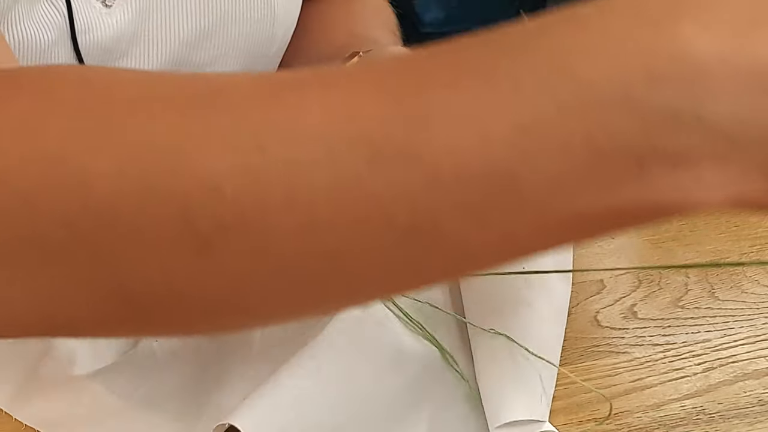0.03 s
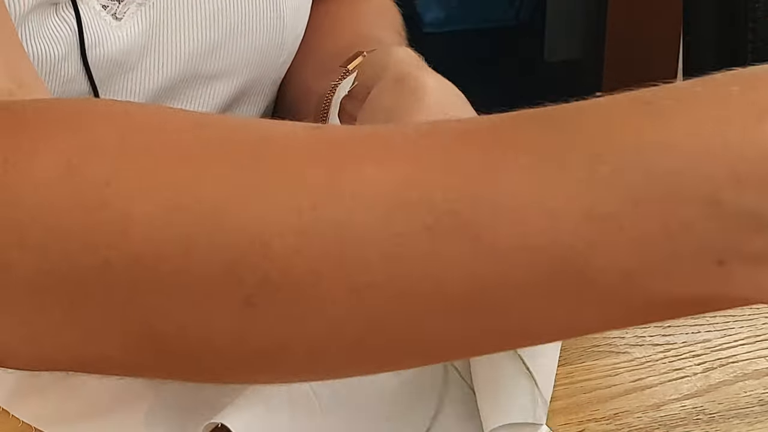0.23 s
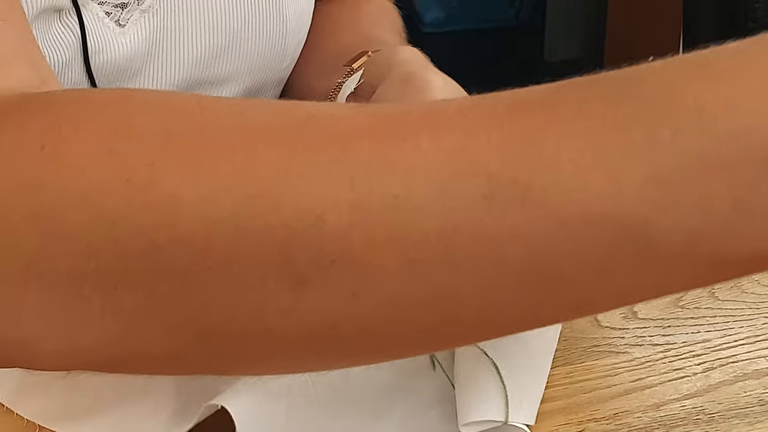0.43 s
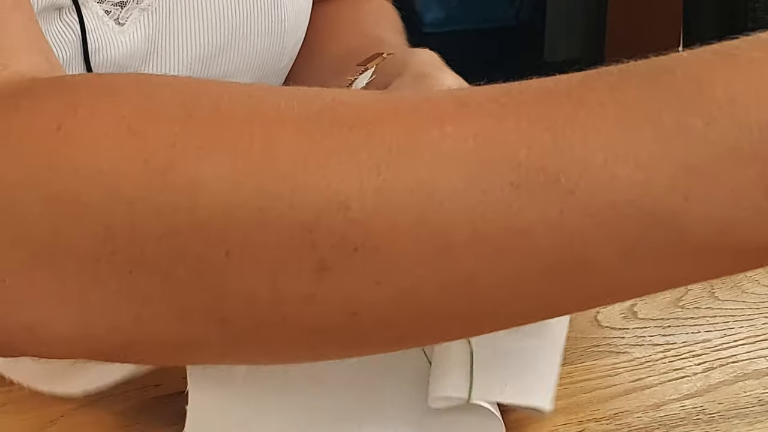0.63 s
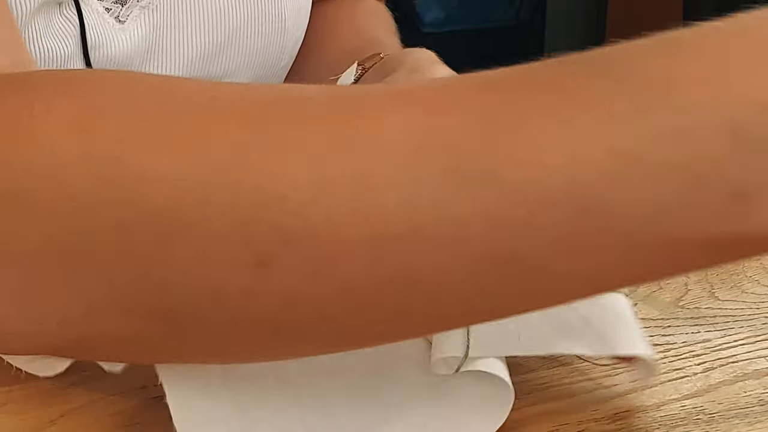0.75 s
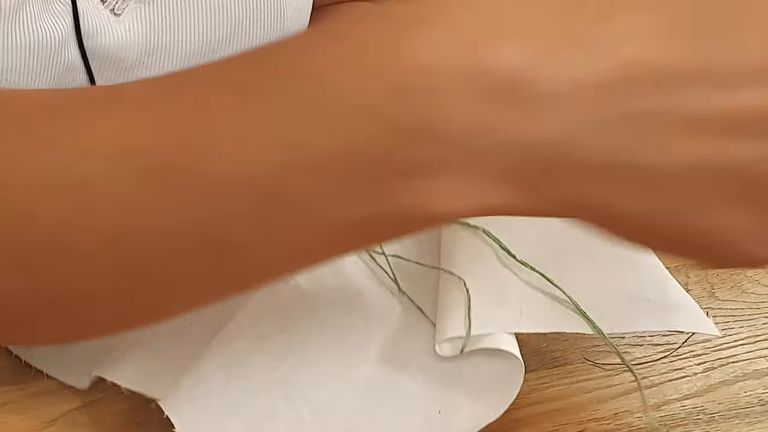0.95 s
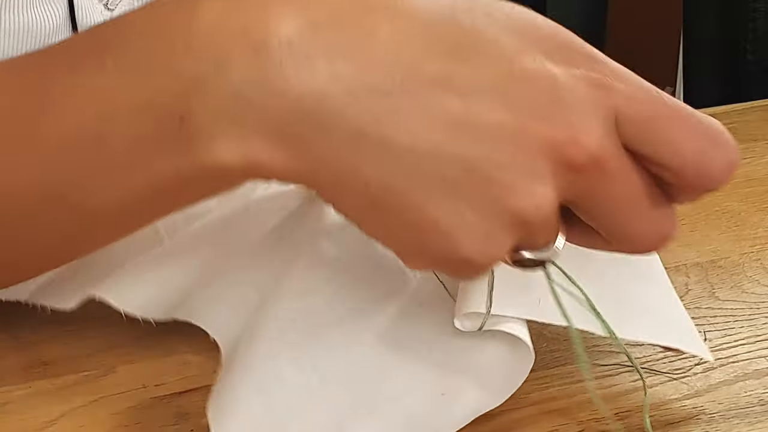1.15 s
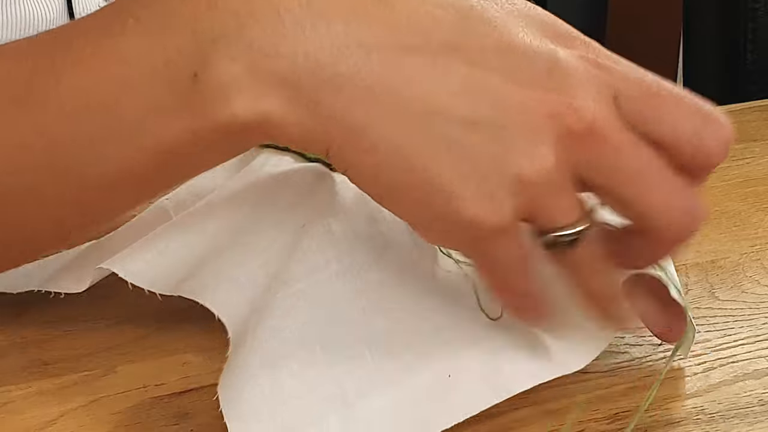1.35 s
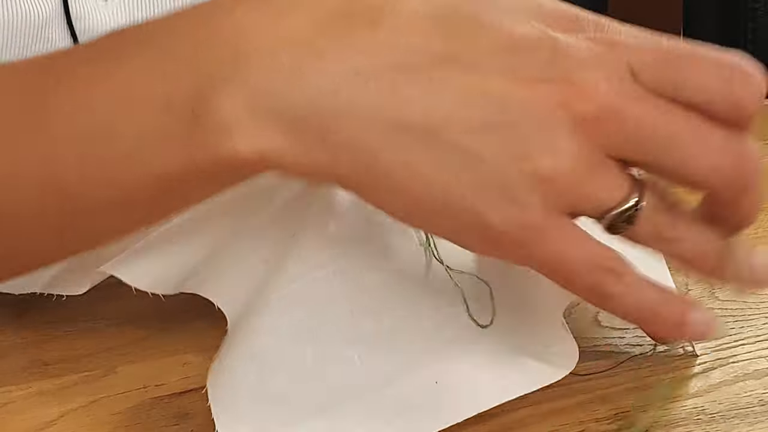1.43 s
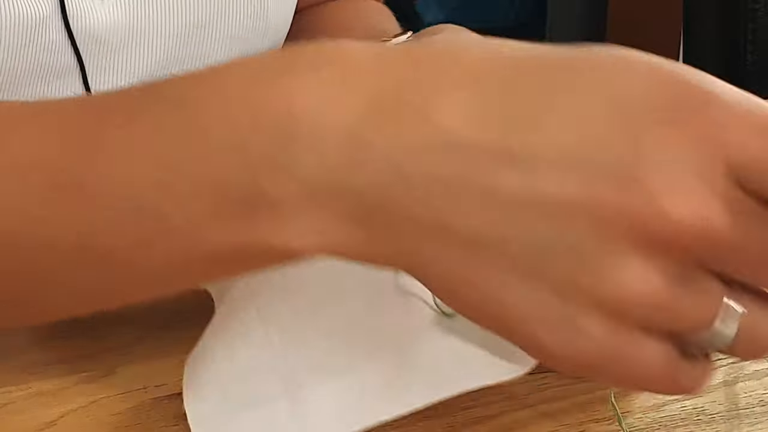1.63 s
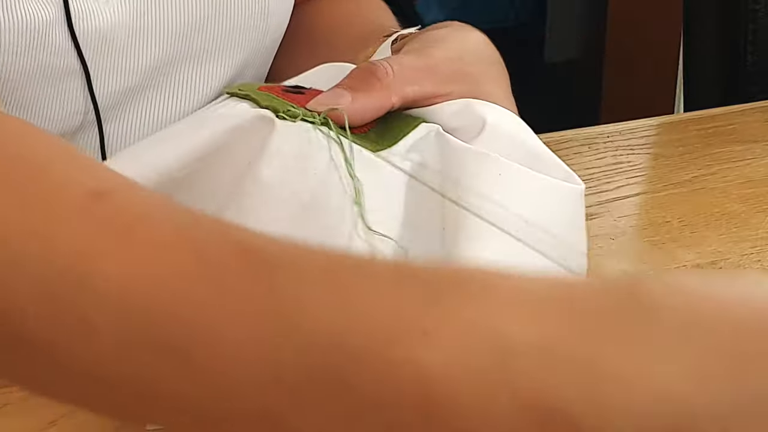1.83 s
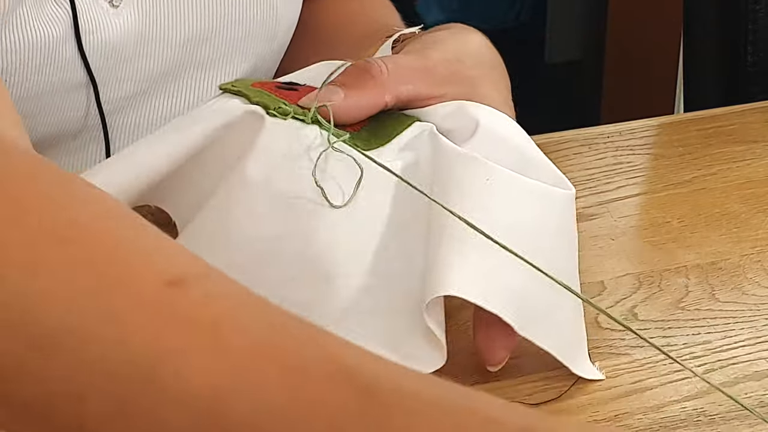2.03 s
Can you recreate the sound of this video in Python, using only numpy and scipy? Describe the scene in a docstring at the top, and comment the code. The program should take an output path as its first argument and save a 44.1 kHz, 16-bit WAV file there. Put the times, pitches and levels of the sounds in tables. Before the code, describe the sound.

Thread hisses through fabric and snaps it taut with one loud, hollow pop. The cloth then flops and slides on a wooden table, with small thread ticks and soft bumps, close to the microphone in a quiet room.

```python
"""A small, quiet room: hand sewing at a wooden table. A thread hisses through the weave, ticking
as it catches, and snaps the cloth taut with a loud, hollow pop. The cloth flops back and slides
on the table with the friction of many tiny fibres, an arm brushes past, and the thread ticks as
it is drawn again. Soft bumps and stirred air rumble at the close microphone."""
import sys
import numpy as np
from scipy import signal
from scipy.fft import rfft, irfft
from scipy.io import wavfile

SR = 44100
rng = np.random.default_rng(int(sys.argv[2]) if len(sys.argv) > 2 else 0)


def store_pcm(level_fs):
    """Save levels as 16-bit WAV."""
    pcm = np.round(np.clip(level_fs, -1, 1) * 32767).astype(np.int16)
    wavfile.write(sys.argv[1], SR, np.atleast_2d(pcm).T)


N = 92610


def undb(db):
    return 10 ** (np.asarray(db) / 20)


def unit_rms(x):
    return x / np.sqrt(np.mean(x ** 2))


def clock():
    return np.arange(N) / SR


def freqs():
    return np.maximum(np.arange(N + 1) * SR / (2 * N), 1)


def noise():
    return rng.standard_normal(N)


def fader(points):
    """Gain riding along points of t/s, level/dB."""
    return undb(np.interp(clock(), *np.array(points).T))


def eq(points):
    """EQ curve in dB through points of f/Hz, level/dB, rolling off beyond its ends."""
    hz, db = np.array(points, float).T
    roll_off = np.minimum(freqs() / hz[0], 1) * np.minimum(hz[-1] / freqs(), 1) ** 2
    return np.interp(np.log(freqs()), np.log(hz), db) + 20 * np.log10(roll_off)


def tilt(db_per_octave, corner_hz=1160):
    """EQ curve in dB that slopes the treble above a corner."""
    return db_per_octave * np.log2(np.hypot(1, freqs() / corner_hz))


def colour(x, eq_db):
    """Minimum-phase filter shaped by an EQ curve; white noise keeps its level."""
    gain = unit_rms(undb(eq_db))
    cepstrum = irfft(np.log(gain + 1e-9))
    cepstrum[1:N] *= 2
    cepstrum[N + 1:] = 0
    return irfft(rfft(x, 2 * N) * np.exp(rfft(cepstrum)))[:N]


def noise_bed(points):
    """Steady noise at unit RMS, coloured by EQ points."""
    return unit_rms(colour(noise(), eq(points)))


def decay(start, t60, rise=0.):
    """Envelope of a hit: silence, an attack, then an exponential fall."""
    age = np.maximum(clock() - start, 0)
    attack = np.minimum(age / max(rise, 1 / SR), 1)
    return attack * np.exp(-np.log(1000) * age / t60)


def ring(start, hz, t60, rise=0.):
    """One damped mode."""
    return decay(start, t60, rise) * np.sin(2 * np.pi * hz * (clock() - start))


def stroke(peak, rise, fall, roundness=1.68):
    """Envelope of a movement that swells to its peak and dies away."""
    age = clock() - peak
    return np.exp(-np.abs(age / np.where(age < 0, rise, fall)) ** roundness)


def fibres(slips_per_s=9000, spread_db=2.5):
    """The grain of cloth friction: dense, tiny slips of uneven size."""
    slips = rng.random(N) < slips_per_s / SR
    polarity = np.sign(noise())
    size = undb(spread_db * np.minimum(rng.exponential(size=N), 5))
    return unit_rms(slips * polarity * size)


def thread():
    """The thread hisses through the weave, loudest at full speed."""
    # the pull on the thread: t/s, level/dB
    draw = [(0, -51.5), (.04, -50), (.115, -44.5), (.145, -39.5), (.19, -41.5), (.22, -44.5), (.26, -45.5),
            (.31, -50.5), (.47, -55), (.6, -100)]
    # tone of the hiss: f/Hz, level/dB
    hiss_eq = [(300, -0.5), (700, 0), (1500, -3), (2800, -5.5), (3900, -6), (5200, -5.5), (6100, -10.5),
               (7500, -11), (9000, -8.5), (9900, -11.5), (12000, -9.5), (13500, -13), (15500, -18)]
    return colour(fibres() * fader(draw), eq(hiss_eq))


def arm():
    """Dull rubbing of the moving arm and clothes."""
    # the arm's movement: t/s, level/dB
    movement = [(0, -46.5), (.22, -74), (.3, -48), (.4, -34.5), (.5, -36.5), (.59, -34), (.69, -66),
                (.8, -55), (.93, -54), (1.08, -54), (1.2, -41.5), (1.45, -39.5), (1.61, -45), (1.7, -41),
                (1.85, -42), (2.1, -41)]
    # tone of the rubbing: f/Hz, level/dB
    rub_eq = [(30, -19), (60, -2), (130, -2), (220, -6), (400, -12.5), (800, -16.5), (1600, -32),
              (4000, -40.5)]
    return noise_bed(rub_eq) * fader(movement)


def air(rise_s=0.0144, rumble_db=-31):
    """Stirred air and single puffs rumble at the microphone."""
    # puffs of air: t/s, level/dB, f/Hz, t60/s
    puffs = [(0.288, -15, 18.3, 0.49), (.40, -23.5, 42.7, 0.44), (0.511, -9.5, 15.4, 0.61),
             (.555, -10.5, 35.5, 0.17), (0.739, -7, 26.5, .2), (0.829, -15, 31, 0.13),
             (0.974, -14.5, 12.5, 0.67), (1.579, -24, 35, 0.12), (1.757, -19.5, 39, 0.22)]
    # tone of the steady rumble: f/Hz, level/dB
    rumble_eq = [(5, -1), (12, -0.5), (30, -17), (50, -15), (90, -37), (300, -67)]
    buffeting = sum(undb(db) * ring(t, hz, t60, rise_s) for t, db, hz, t60 in puffs)
    return buffeting + undb(rumble_db) * noise_bed(rumble_eq)


def room_tone(level_db=-51):
    """A faint, dark hush under everything."""
    # tone of the hush: f/Hz, level/dB
    hush_eq = [(100, 1.5), (250, -1), (500, -3.5), (900, -10), (1500, -12.5), (3000, -17.5), (9000, -21.5),
               (12500, -23.5), (15000, -34)]
    return undb(level_db) * noise_bed(hush_eq)


def ticks(scrape_db=-14, scrape_t60_s=0.0046):
    """The thread catches and lets go: a sharp click with a tiny scrape."""
    # catches on the weave: t/s, peak level/dB, treble tilt/(dB per octave)
    catches = [(0.1373, -31, -8), (.25, -32, 10), (.681, -33, 8), (0.7984, -23, 0), (.988, -35, 7),
               (1.743, -30.5, -4), (1.812, -31, 2), (1.8172, -26, 0), (1.8833, -25, 1), (1.9537, -30, -5),
               (1.9674, -30, -2), (1.9809, -28, 0), (1.996, -28, -2.5), (2.0471, -26.5, -4.5),
               (2.07, -31, -1)]
    # tone of a click: f/Hz, level/dB
    click_eq = [(400, 3), (1500, 4.5), (5000, -5), (9000, -6.5), (13000, -7), (15500, -18)]
    out = 0
    for t, db, slope in catches:
        slip = undb(scrape_db) * noise() * decay(t, scrape_t60_s)
        slip[int(t * SR)] += 1
        click = colour(slip, eq(click_eq) + tilt(slope))
        out = out + undb(db) * click / np.abs(click).max()
    return out


def bumps(rise_s=0.0056, thud_db=-8):
    """Hand and forearm knock softly on the table: one low mode and a dull thud each time."""
    # padded knocks: t/s, level/dB, f/Hz, t60/s
    knocks = [(.238, -34, 117, 0.091), (0.291, -20.5, 70.6, 0.12), (.401, -23.5, 55, 0.073),
              (0.444, -24.5, 48, 0.24), (.736, -24, 85, 0.041), (.797, -35, 107, 0.25),
              (0.963, -26.5, 78, 0.17), (1.181, -30, 62, .3), (1.301, -36, 61, 0.47),
              (1.754, -31.5, 78, 0.16), (1.838, -24, 175, 0.052)]
    # tone of the thud: f/Hz, level/dB
    thud_eq = [(50, -0.5), (130, -1.5), (230, -3), (350, -11.5), (800, -30.5)]
    thud = undb(thud_db) * noise_bed(thud_eq)
    return sum(undb(db) * (ring(t, hz, t60, rise_s) + thud * decay(t, t60, rise_s))
               for t, db, hz, t60 in knocks)


def flaps():
    """Loose folds flop and rustle with a hollow tone, some brighter than others."""
    # flopping folds: peak t/s, level/dB, rise/s, fall/s, treble tilt/(dB per octave)
    folds = [(.42, -60, .09, 0.096, -1), (.768, -27.5, 0.0088, .035, 5.5), (0.819, -35.5, 0.073, 0.058, -2),
             (1.12, -38.5, 0.048, 0.098, -15.5), (1.2, -51, 0.032, 0.078, -7), (1.39, -52, 0.12, 0.15, -3),
             (1.517, -36, 0.0087, 0.021, -12), (1.748, -37.5, 0.0088, 0.0074, 3)]
    # hollow tone of a fold: f/Hz, level/dB
    fold_eq = [(100, -24), (250, -5), (350, -3), (450, 4), (520, -6.5), (610, 6.5), (760, -4.5),
               (880, -2.5), (1100, -7.5), (1500, -18.5), (1900, -15), (2600, -30), (5000, -39)]
    return sum(undb(db) * colour(fibres() * stroke(t, rise, fall), eq(fold_eq) + tilt(slope))
               for t, db, rise, fall, slope in folds)


def pop(start_s=0.4865, swell_cycles=4):
    """The cloth snaps taut: a quick run of cracks, a short hollow ring and the room's answer."""
    # jerks of the cloth: t/s, level/dB, t60/s
    jerks = [(0.4837, -16.5, 0.036), (0.4856, -6.5, 0.02), (0.4865, -20, 0.012), (.4950, -18, 0.011),
             (0.5206, -20, 0.016)]
    # tone of the cracks: f/Hz, level/dB
    crack_eq = [(150, -5), (350, -2), (470, 8), (650, -2.5), (900, 9.5), (1300, -11), (2200, -5.5),
                (2950, -7), (3600, -4.5), (4200, -11), (5000, -8), (6400, -27), (7800, -16), (9500, -19.5),
                (11700, -21), (15500, -33)]
    # modes of the taut cloth and the hand and table under it: f/Hz, level/dB, t60/s
    modes = [(347, -29, .36), (430, -17, .07), (461, -5.5, .115), (586, -28, .36), (685, -21, .19),
             (872, -16, .11), (927, -14.5, .11), (1035, -22, .15), (1568, -24, .2), (1817, -27, .2),
             (2002, -26, .15), (2762, -25, .12), (3040, -26, .15), (3560, -26, .1)]
    bursts = sum(undb(db) * decay(t, t60) for t, db, t60 in jerks)
    cracks = colour(noise() * bursts, eq(crack_eq))
    body = sum(undb(db) * ring(start_s, hz, t60, swell_cycles / hz) for hz, db, t60 in modes)
    return cracks + body + pop_tail(start_s)


def pop_tail(start_s, level_db=-15, split_hz=3900, rise_s=0.0043):
    """The room answers the pop with a diffuse wash whose treble dies a little sooner."""
    # tone of the wash: f/Hz, level/dB
    wash_eq = [(150, -12), (250, -12.5), (345, -3), (400, -6), (480, -2.5), (630, -5), (850, -5.5),
               (1300, -10.5), (2000, -15), (3000, -17.5), (3700, -22), (4700, -21), (5500, -27),
               (7500, -28.5), (11500, -34), (15500, -42)]
    wash = noise_bed(wash_eq)
    lows = irfft(rfft(wash, 2 * N) / (1 + (freqs() / split_hz) ** 2))[:N]
    low_tail = lows * decay(start_s, t60=0.38, rise=rise_s)
    high_tail = (wash - lows) * decay(start_s, t60=0.33, rise=rise_s)
    return undb(level_db) * (low_tail + high_tail)


def swishes():
    """Cloth and skin slide: fibre friction, each stroke with its own bell-shaped boost or dip."""
    # slides: peak t/s, level/dB, rise/s, fall/s, bell f/Hz, bell gain/dB, bell width/octaves
    slides = [(.78, -44.5, 0.047, 0.087, 14000, 10, 0.5), (.833, -49.5, 0.0057, 0.025, 7500, 15, 0.79),
              (1.125, -47, 0.09, .1, 10000, 7, 0.54), (1.28, -47.5, 0.086, 0.14, 7040, -2, 0.53),
              (1.396, -44.5, .1, 0.031, 4200, -2, 0.49), (1.575, -45.5, 0.023, .08, 6400, 7, 0.094),
              (1.712, -45.5, 0.056, 0.064, 7300, 3.5, 0.2), (1.84, -51, 0.086, 0.082, 6500, 0, .3),
              (1.975, -55.5, 0.041, 0.072, 4150, 11, 0.16)]
    # tone common to all slides: f/Hz, level/dB
    slide_eq = [(150, -8), (500, 4), (1300, 5), (2800, -3), (3750, 0), (4200, -3), (5300, -3.5), (8000, -5),
                (12500, -11.5), (15000, -17.5)]
    out = 0
    for t, db, rise, fall, hz, bell_db, width in slides:
        bell = bell_db * np.exp(-.5 * (np.log2(freqs() / hz) / width) ** 2)
        friction = fibres() * stroke(t, rise, fall)
        out = out + undb(db) * colour(friction, eq(slide_eq) + bell)
    return out


def room(x, predelay_s=0.00448, t60_s=0.33, wet_db=-12.5):
    """The near walls add a short, diffuse echo with scooped upper mids."""
    echo = colour(noise() * decay(predelay_s, t60_s), eq([(100, 0), (3000, -13.5), (15000, 0)]))
    return x + undb(wet_db) * signal.fftconvolve(x, echo / np.linalg.norm(echo))[:N]


def scene():
    """Mono mix: the handling goes through the room; the pop carries its own tail."""
    handling = room(thread() + arm() + ticks() + bumps() + flaps() + swishes())
    return (handling + air() + room_tone() + pop())[None]


def record(dry):
    """The recorder cuts the top with a steep low-pass."""
    top_hz = 15780
    return signal.sosfilt(signal.ellip(10, .2, 80, top_hz, fs=SR, output="sos"), dry)


dry = scene()
out = record(dry)
store_pcm(out)
```